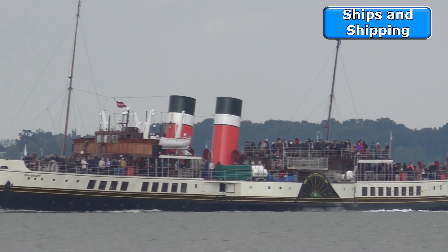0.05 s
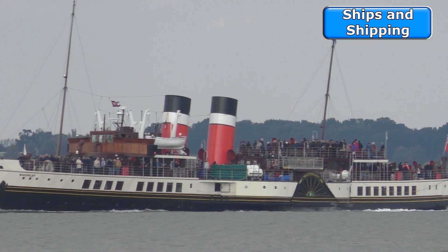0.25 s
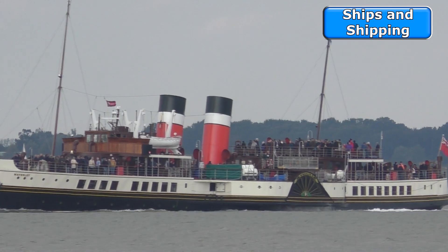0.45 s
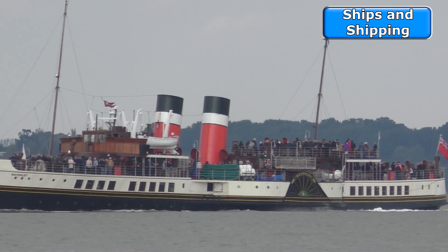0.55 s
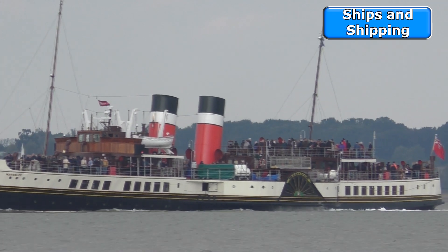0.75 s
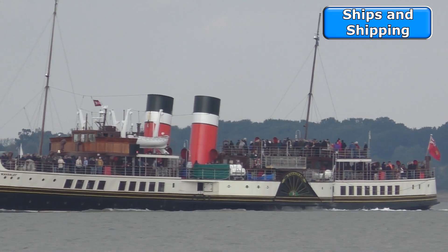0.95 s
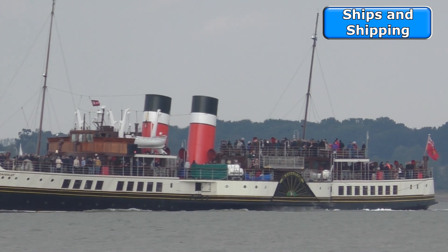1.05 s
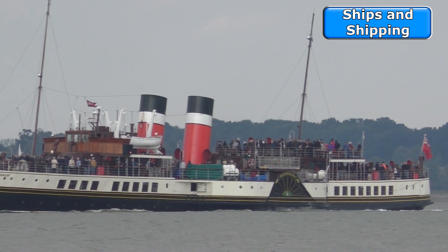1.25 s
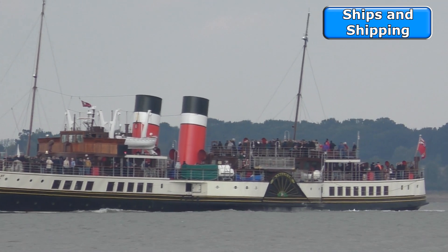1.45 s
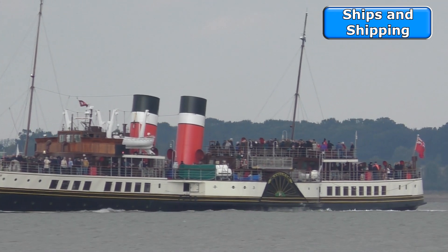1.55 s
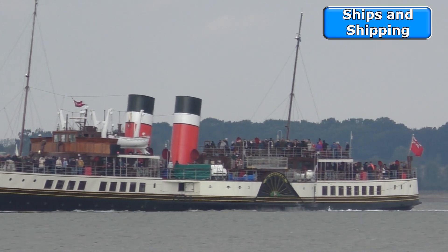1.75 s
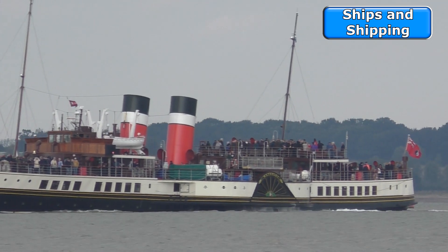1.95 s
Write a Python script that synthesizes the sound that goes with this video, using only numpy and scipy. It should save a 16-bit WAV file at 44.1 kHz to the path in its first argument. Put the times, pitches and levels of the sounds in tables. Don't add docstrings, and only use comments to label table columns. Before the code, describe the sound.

Small wavelets wash, fizz and drain at the water's edge over a steady soft hiss of open water, while low wind gusts thump a small microphone, strongest in the first half second.

```python
import sys
import numpy as np
from scipy import signal
from scipy.fft import rfft, irfft, next_fast_len
from scipy.io import wavfile
from scipy.ndimage import uniform_filter1d, map_coordinates

SR = 44100
rng = np.random.default_rng(int(sys.argv[2]) if len(sys.argv) > 2 else 0)


def voltage_ratio(decibels):
    exponent = np.asarray(decibels, float) / 20
    return 10 ** exponent


def digitize_waveform(pressure):
    field = np.atleast_2d(pressure).T
    bounded = np.clip(field, -1, 1)
    quanta = np.round(bounded * 32767).astype(np.int16)
    wavfile.write(sys.argv[1], SR, quanta)


N = 88200


def unit(x):
    return x / np.sqrt(np.mean(x ** 2) + 1e-20)


def along(points, hz):
    point_hz, value = np.transpose(points)
    return np.interp(np.log(hz + 1), np.log(point_hz + 1), value)


def wobble(rate):
    return map_coordinates(rng.standard_normal(400), [np.arange(N) * rate / SR])


def filtered(x, response):
    size = next_fast_len(N + SR // 4)
    return irfft(rfft(x, size) * response(np.fft.rfftfreq(size, 1 / SR)), size)[:N]


def shaped(x, gain):
    hz, t, z = signal.stft(x, SR, nperseg=512, noverlap=384)
    return signal.istft(z * gain(hz[:, None] + 1, t), nperseg=512, noverlap=384)[1][:N]


def swings(events):
    t = np.arange(N) / SR
    total = np.zeros(N)
    for (s, db, hz, cycles), turn in zip(events, rng.random(len(events))):
        bell = np.exp(-(2 * (t - s) * hz / cycles) ** 2)
        total += voltage_ratio(db) * bell * np.cos(2 * np.pi * (hz * (t - s) + turn))
    return total


def sea():
    level_db, tilt_db_per_octave = -60.5, -2.5
    white = rng.standard_normal(N)
    hiss = filtered(white, lambda hz: voltage_ratio(tilt_db_per_octave * np.log2(hz / 1000 + 0.055)))
    breathing_db = 0.42 * wobble(6.1) + 0.55 * wobble(29.6) + 0.93 * wobble(90)
    return voltage_ratio(level_db + breathing_db) * unit(hiss)


# (time [s], level [dB])
BREEZE = [(0, -67.5), (.17, -61), (.23, -52), (.5, -49), (.54, -54), (.64, -59.5), (.72, -62), (.86, -60),
          (.94, -60), (1.15, -55.5), (1.301, -69), (1.43, -71.5), (1.49, -44), (1.55, -65.5), (1.63, -61.5),
          (1.76, -56.5), (1.83, -65.5), (2, -60)]
# (frequency [Hz], density [dB per Hz])
RUMBLE = [(15, -52), (25, -30.5), (89, -8), (179, -7.5), (276, -9), (400, -33), (440, -65), (570, -45),
          (970, -120)]
# (time [s], peak level [dB], pitch [Hz], length [cycles])
EDDIES = [(0.2, -35, 117, 2.25), (0.221, -24, 179, 1.15), (.245, -23.5, 157.5, 1.58),
          (0.266, -30, 195.5, 2.2), (0.295, -26.5, 195, 1.37), (0.31, -23.5, 166, 2.16),
          (0.348, -29, 199, 2.1), (0.359, -25.5, 124, 1.5), (.396, -22.5, 104, 1.48),
          (.425, -29.5, 129, 1.77), (.446, -23.5, 162, 2.07), (.464, -27, 198, 1.66),
          (0.499, -31, 137, 2.55), (0.842, -40, 112, 1.1), (.876, -43, 98.2, 1.3), (1.24, -42.5, 262, 4.5),
          (1.461, -36, 145, 1.1), (1.483, -24.5, 150.4, 1.52), (1.502, -29, 146, 1.16),
          (1.737, -34.5, 147, 1.8), (1.767, -35, 145, 0.93), (1.802, -45.5, 195, 2.1),
          (1.884, -43.5, 131, 0.97), (0.599, -41.5, 252, 3.3), (0.235, -28.5, 110, 1.36),
          (.374, -31, 127, 1.5), (0.483, -32.5, 141, 2.4), (0.567, -52, 73.3, 1.3), (0.791, -55, 79, 1.7),
          (1.592, -51, 110, 1.6),
          (0.019, -68, 94, 1.3), (.14, -52, 210, 1.9), (0.174, -49.5, 110, 3.2), (0.324, -32, 175, 1.34),
          (0.52, -43, 130, 0.77), (0.25, -38, 315, 1.8), (1.008, -49, 96, 1.6), (1.031, -47.5, 97, 1.1),
          (1.11, -54.5, 107, 2.8), (1.165, -47.5, 122, 2.3), (1.2, -57, 63, 1.6), (1.527, -51, 120, 1.3),
          (1.662, -49.5, 255, 4.3), (1.695, -49, 205, 5), (1.861, -51, 124, 1.6), (1.929, -54.5, 130, 2),
          (1.975, -46.5, 100, 1.26), (.49, -37.5, 69, 1.5), (.252, -37, 87, 1.6), (0.306, -38, 79, 1.8),
          (.605, -52.5, 78, 1.7), (0.069, -64, 66, 2.2), (.336, -42, 160, 1.2), (.385, -38, 190, 1.8),
          (.409, -39, 210, 1.1), (.456, -40, 56, 1.4), (.917, -54, 70, 1.5), (.333, -46, 70, 1.2),
          (1.724, -43, 140, 1.5), (1.785, -45, 160, 1.5), (.258, -38, 57, 1.1), (1.94, -57, 50, 1.3),
          (1.575, -56, 180, 2.3), (1.692, -54, 80, 2)]


def wind():
    rumble_db, lumpy_db = 1.5, 4
    port_top_hz, port_slope = 362, 18
    turbulence = filtered(rng.standard_normal(N), lambda hz: voltage_ratio(along(RUMBLE, hz)))
    rumble = unit(voltage_ratio(lumpy_db * wobble(21.96)) * turbulence)
    strength_db = np.interp(np.arange(N) / SR, *np.transpose(BREEZE))
    pressure = voltage_ratio(strength_db + rumble_db) * rumble + swings(EDDIES)
    return filtered(pressure, lambda hz: 1 / np.sqrt(1 + (hz / port_top_hz) ** port_slope))


def bubbles():
    pop_share, pops_per_s, pop_cycles, scatter_db = 0.32, 2500, 2.84, 4
    at, pitch, size = rng.random((int(pops_per_s * N / SR), 3)).T
    hz = (300 * 50 ** pitch)[:, None]
    k = np.arange(600)
    cycles = hz * k / SR
    ring = np.sin(2 * np.pi * cycles) * np.exp(-cycles / pop_cycles * 2)
    pop = ring * (1 - np.exp(-cycles * 2)) * hz
    pop *= voltage_ratio(-scatter_db * np.log(0.82 * size + 0.035))[:, None]
    places = (at * N).astype(int)[:, None] + k
    pops = np.bincount(places.ravel(), pop.ravel(), minlength=N)[:N]
    rush = rng.standard_normal(N)
    return np.sqrt(pop_share) * unit(pops) + np.sqrt(1 - pop_share) * rush


# (crest time [s], level [dB], length [s], bubble pitch [Hz])
WAVELETS = [(0.04, -57.5, 0.067, 2440), (0.319, -56, 0.099, 2950), (0.446, -61.5, 0.14, 1320),
            (0.572, -56.5, 0.14, 3150), (0.28, -62, 0.056, 8700), (0.614, -57.5, 0.069, 11100),
            (0.46, -63, 0.051, 8600), (0.642, -54, 0.13, 262), (0.914, -61.5, 0.092, 9000),
            (1.068, -57, 0.082, 1120), (1.09, -57.5, 0.065, 3600), (1.228, -59, 0.07, 1330),
            (1.266, -59, 0.053, 3470), (1.24, -58.5, 0.056, 470), (1.07, -63.5, 0.033, 10000),
            (1.214, -63.5, 0.063, 11200), (1.05, -61, 0.078, 550), (1.44, -61.5, 0.098, 3320),
            (1.465, -67, 0.044, 1130), (1.708, -60.5, 0.062, 298), (1.83, -69.5, 0.1, 10000),
            (1.85, -66.5, 0.1, 3350), (1.98, -62, 0.044, 2260), (1.98, -64.5, 0.07, 5800),
            (0.594, -60.5, 0.1, 860), (0.019, -63.5, 0.038, 590), (.5, -65.5, 0.039, 550),
            (1.97, -63.5, 0.023, 450), (1.4, -69, 0.062, 3900), (0.804, -66, 0.079, 1600),
            (0.83, -63, 0.024, 820), (1.72, -71, 0.032, 2100), (0.66, -66.5, .06, 2700),
            (1.08, -62.5, 0.082, 330), (1.15, -68, .04, 3800), (1.84, -72, 0.064, 990),
            (1.3, -66, 0.048, 1000), (0.64, -63.5, 0.042, 340), (1.13, -63.5, 0.052, 2000),
            (0.45, -64.5, 0.034, 380)]


def wash():
    spread_octaves, drain_stretch, patchy_db = 0.59, 1.62, 1.1

    def gain(hz, t):
        power = 0
        for s, db, length, pitch_hz in WAVELETS:
            side_length = length * np.where(t > s, drain_stretch, 1)
            swell = np.exp(-((t - s) / side_length) ** 2)
            band = np.exp(-(np.log2(hz / pitch_hz) / spread_octaves) ** 2) * SR / 2 / pitch_hz
            power = power + voltage_ratio(2 * db) * swell * band
        patches = uniform_filter1d(rng.standard_normal(power.shape), size=6, axis=0)
        patches = uniform_filter1d(patches, size=5, axis=1)
        return np.sqrt(power) * voltage_ratio(patchy_db * unit(patches))

    return shaped(bubbles(), gain)


# (time [s], peak level [dB], level of the duller body [dB])
SPITS = [(0.2208, -47, -4), (0.2792, -42.5, -12), (0.552, -42, -0.5), (0.578, -39, -1),
         (0.5999, -37.5, -10), (0.6648, -48, -3), (0.84, -45, -16), (0.9656, -47, 2), (1.069, -39.5, 2.5),
         (1.1433, -43, 5), (1.196, -43, -1), (1.3348, -50, -7), (1.3702, -48, -12), (1.4047, -51, -9),
         (1.455, -44.5, -13), (1.5573, -47, -1), (1.7229, -52, -1), (1.748, -44, -20), (1.7932, -47, -5),
         (1.968, -44, -5), (.0982, -55, -8), (.1176, -54, -8), (.1675, -54, -8), (.2294, -47, -8),
         (.4289, -47, -6), (.4743, -47, -8), (.5028, -48, -8), (.5252, -49, -10), (.7871, -49, -8),
         (.8185, -50, -8), (.9173, -46, -8), (1.0934, -50, 2), (1.2356, -49, 0), (1.285, -48, -4),
         (1.827, -52, -3), (1.8711, -53, -8)]


def spits():
    length_s, spit_db, extra_body_db = 0.0031, -14, 0.5
    t = np.arange(N) / SR
    bright, body = np.zeros(N), np.zeros(N)
    for s, db, body_db in SPITS:
        puff = voltage_ratio(db + spit_db) * np.exp(-((t - s - length_s / 2) / length_s) ** 2)
        bright += puff
        body += voltage_ratio(body_db + extra_body_db) * puff

    def noise_around(centre_hz):
        white = rng.standard_normal(N)
        return unit(filtered(white, lambda hz: np.exp(-np.log2(hz / centre_hz + 1e-9) ** 2)))

    return bright * noise_around(10100) + body * noise_around(3600)


# (time [s], peak level [dB], pitch [Hz], length [cycles])
GLUGS = [(1.103, -46, 2530, 9.9), (1.149, -46, 1330, 15.4), (1.11, -50, 1236, 18), (1.57, -59.5, 1315, 18),
         (1.4, -52, 1330, 16), (1.37, -55, 1286, 20), (0.83, -58, 1284, 7.6), (0.274, -55, 1500, 20),
         (.24, -55.5, 1480, 20), (1.2, -57, 1400, 7.2), (0.9, -53, 1320, 10), (1.017, -53, 1230, 9),
         (1.07, -48.5, 4100, 13), (1.048, -54, 3300, 14), (1.27, -54, 1200, 17), (1.255, -56, 1700, 14),
         (1.515, -58.5, 1270, 16), (.48, -56, 1185, 16), (.537, -55, 880, 7), (.58, -55, 1270, 18),
         (2, -58, 2450, 14), (1.335, -58, 500, 8.5), (1.735, -54.5, 430, 6), (1.7, -54, 3250, 14),
         (1.5, -56, 4600, 16)]


def glugs():
    return swings(GLUGS)


# (frequency [Hz], width [octaves], depth [dB])
NOTCHES = [
    (824, 0.14, -10.5),
    (1576, 0.077, -3),
    (6810, 0.24, -5),
]
# (time [s], low dip shift [octaves], top dip shift [octaves], depth [ratio])
PAN = [(0, -0.021, .03, 1.1), (.15, .04, .06, 1.5), (.35, 0.015, -.05, 1.7), (.46, 0.018, -0.11, 1.2),
       (.55, -0.023, -.03, 0.73), (.7, .02, 0.0042, 1.5), (.9, -0.019, .08, 1), (1.05, -0.04, 0.058, 0.65),
       (1.3, -0.00072, -0.043, .6), (1.5, -0.019, -0.08, 1), (1.66, 0.22, -.06, 0.88),
       (1.85, -.04, -0.029, 1.4), (2, .1, -0.043, 1.1)]


def housing(hz, t):
    duck_db, knee_db, duck_below_hz = -5, -49.5, 750
    s, *columns = np.transpose(PAN)
    low, top, depth = [np.interp(t, s, column) for column in columns]
    dips_db = 0
    for (dip_hz, width, db), shift in zip(NOTCHES, (low, low, top)):
        dips_db = dips_db + db * depth * np.exp(-((np.log2(hz / dip_hz) - shift) / width) ** 2)
    breeze_db = np.interp(t, *np.transpose(BREEZE))
    gust = 1 / (1 + voltage_ratio(2 * (knee_db - breeze_db)))
    return voltage_ratio(dips_db + duck_db * gust / (1 + (hz / duck_below_hz) ** 6))


# (frequency [Hz], level [dB])
CAPSULE = [(50, -37), (200, 4.5), (600, -1.5), (1250, 4), (3500, 0.5), (5200, -4.5), (10000, 4),
           (15500, -3)]


def microphone(water):
    return shaped(filtered(water, lambda hz: voltage_ratio(along(CAPSULE, hz))), housing)


def scene():
    water = microphone(sea() + wash() + spits())
    return (water + wind() + glugs())[None]


def top_cut(x):
    return signal.sosfilt(signal.butter(12, 15660, fs=SR, output="sos"), x)


def record(dry):
    mix = filtered(dry[0], lambda hz: hz < 15680)[None]
    return top_cut(mix)


dry = scene()
out = record(dry)
digitize_waveform(out)
```